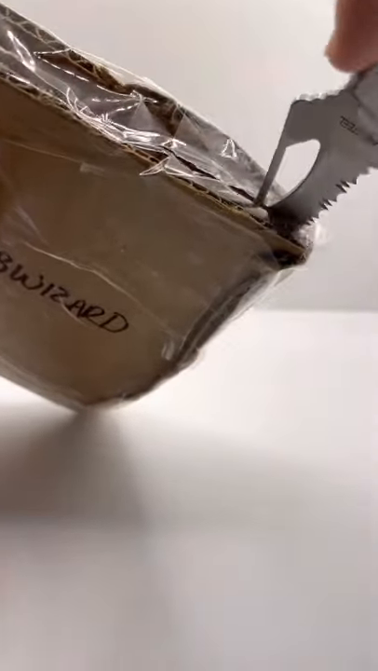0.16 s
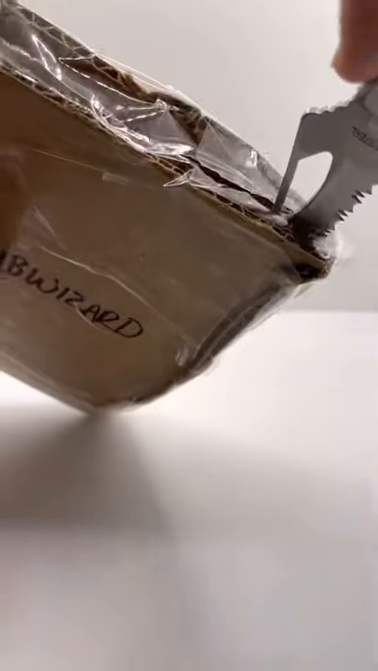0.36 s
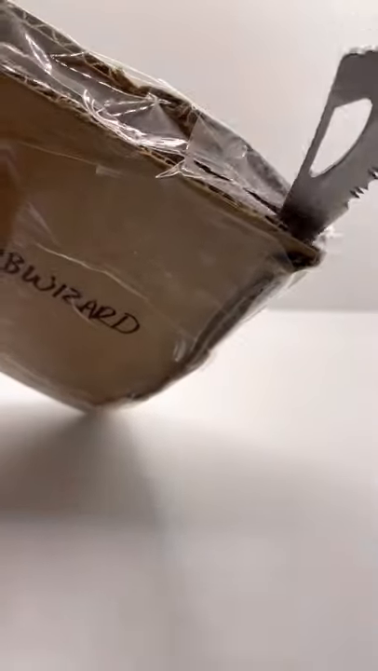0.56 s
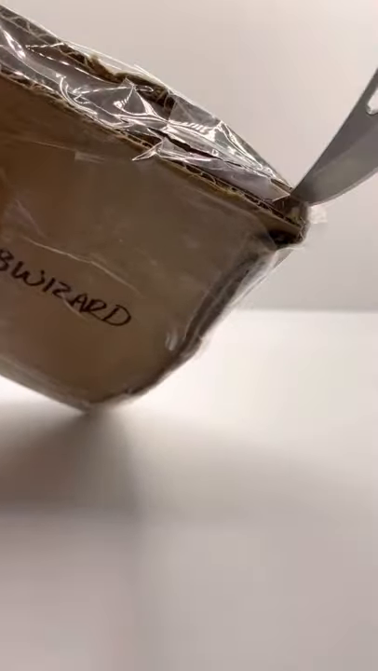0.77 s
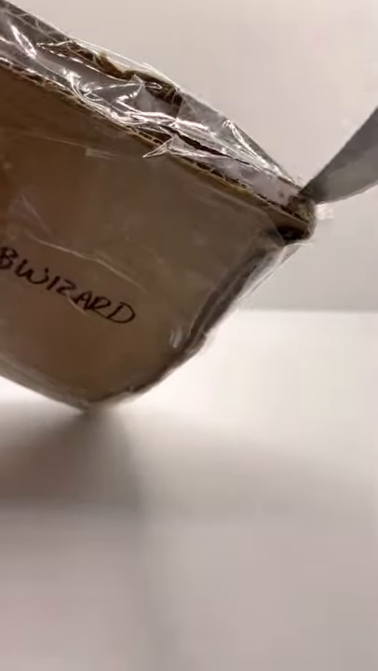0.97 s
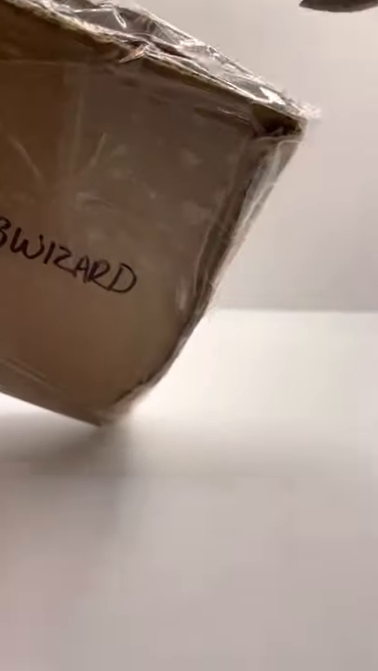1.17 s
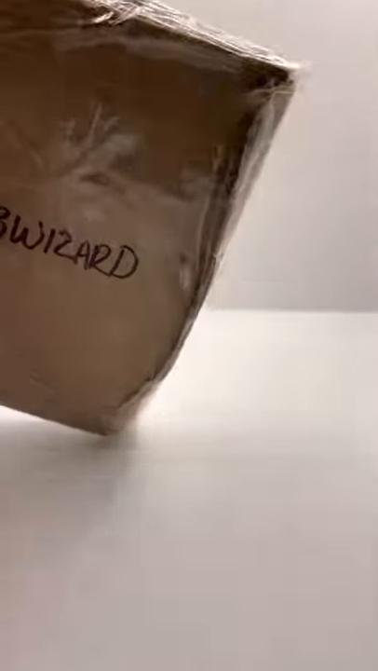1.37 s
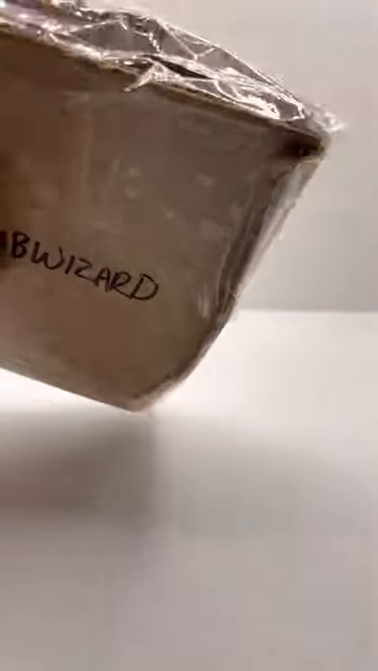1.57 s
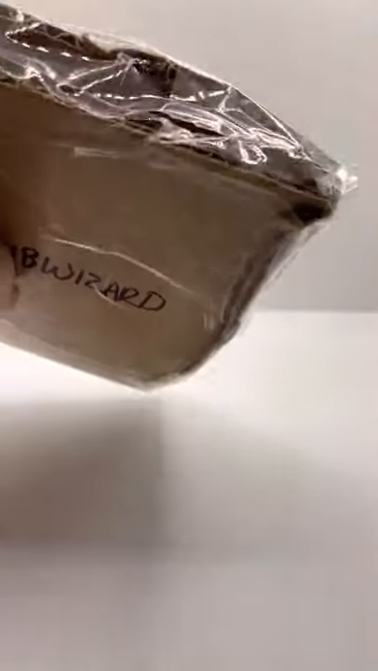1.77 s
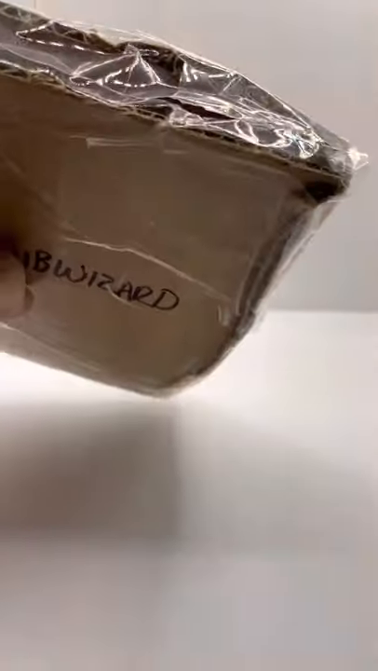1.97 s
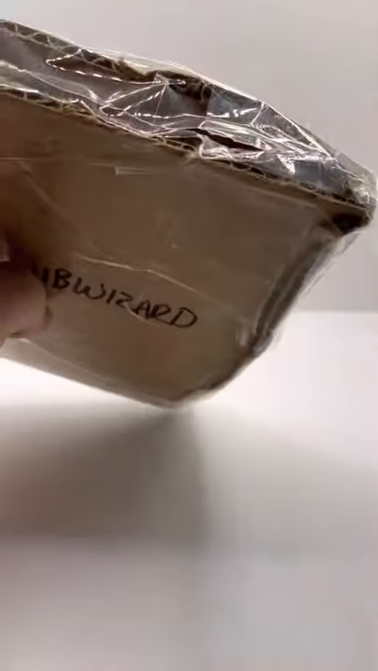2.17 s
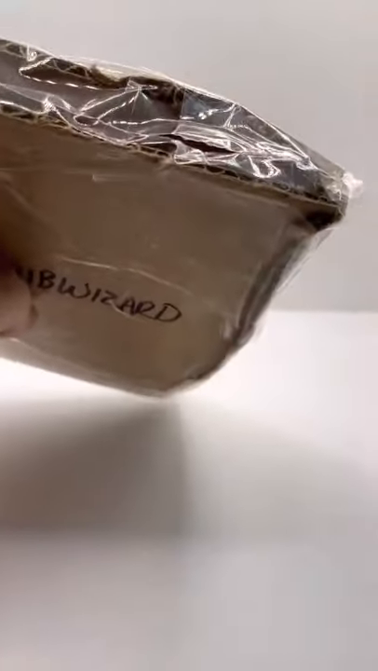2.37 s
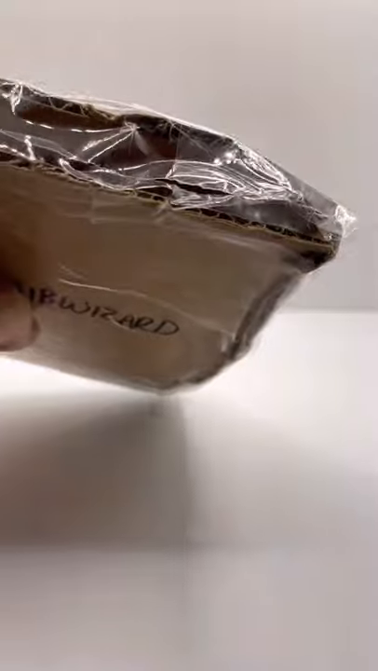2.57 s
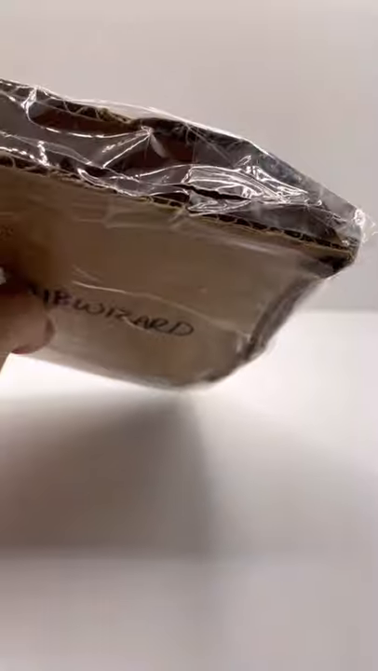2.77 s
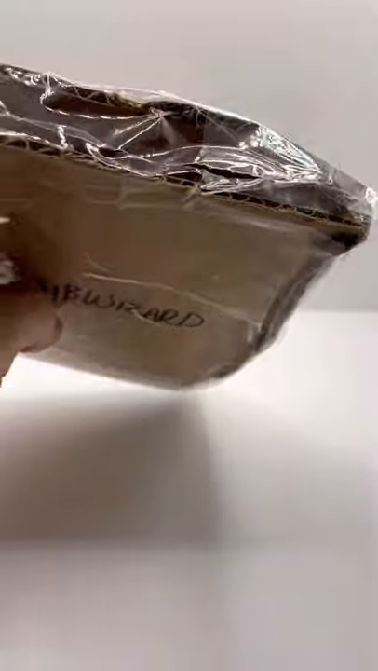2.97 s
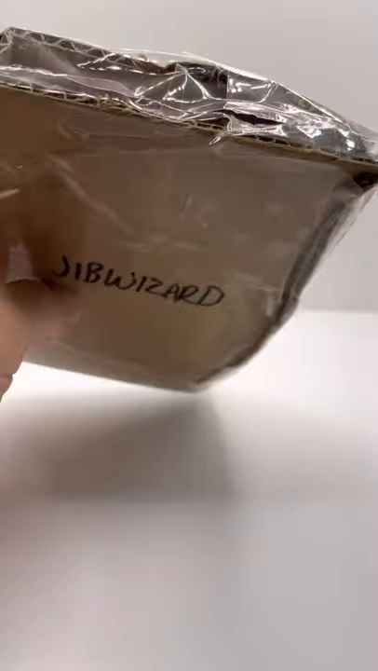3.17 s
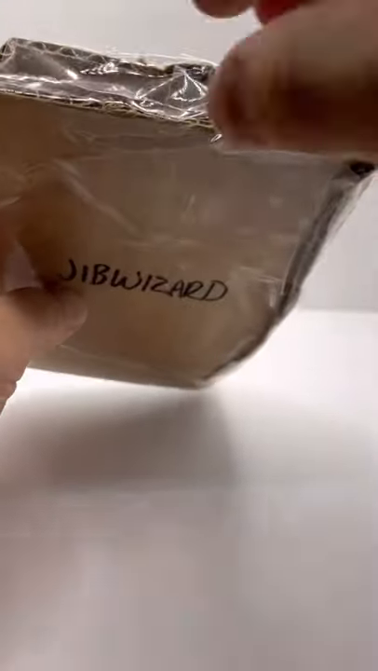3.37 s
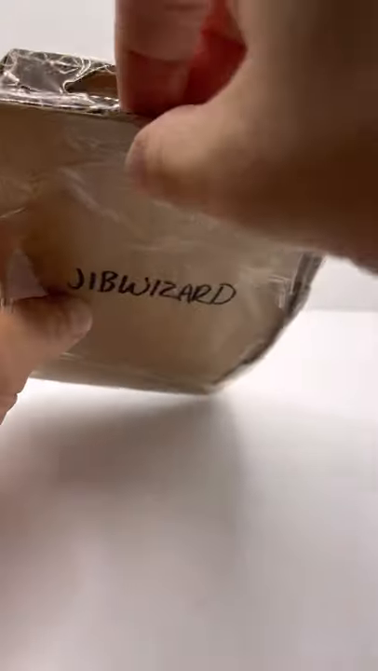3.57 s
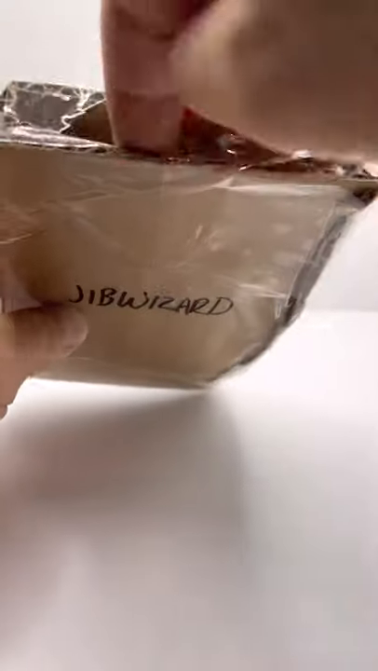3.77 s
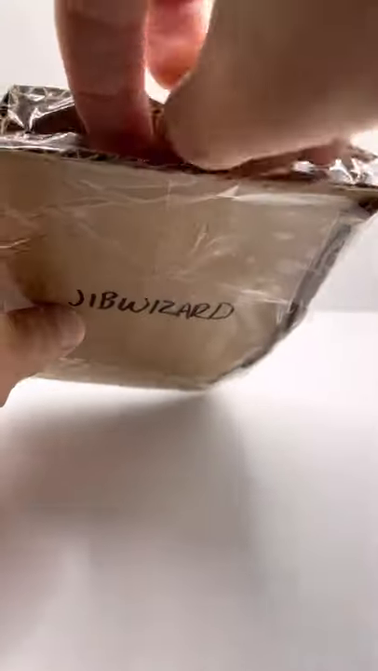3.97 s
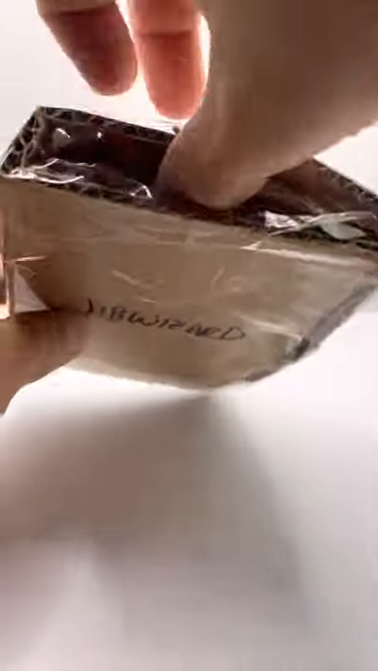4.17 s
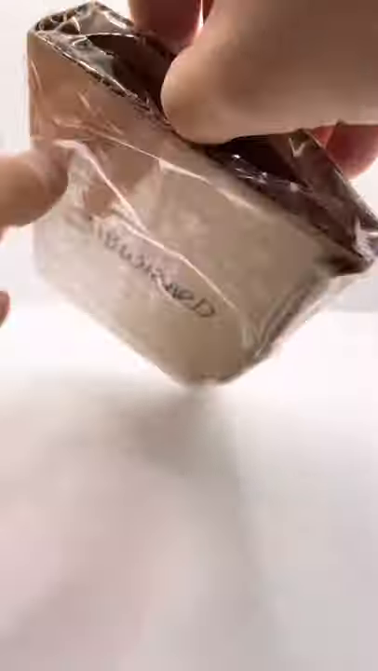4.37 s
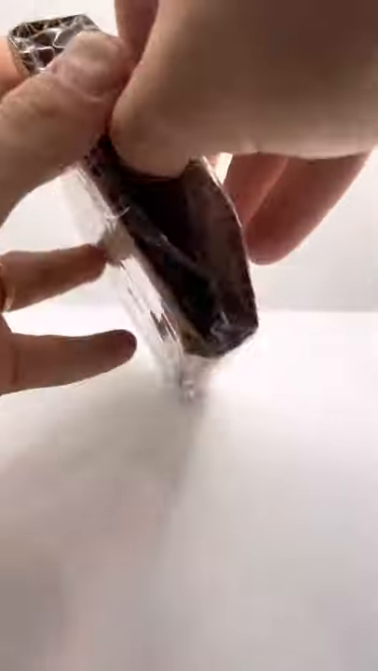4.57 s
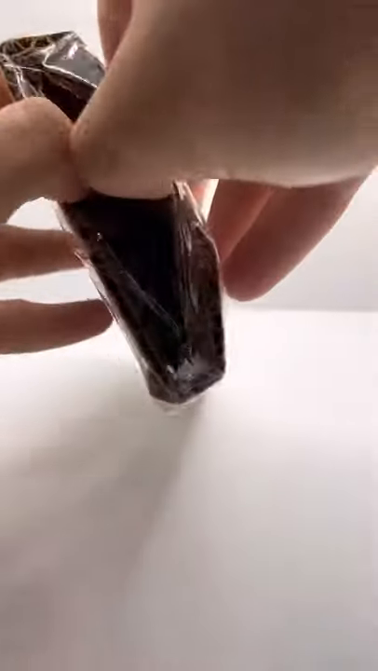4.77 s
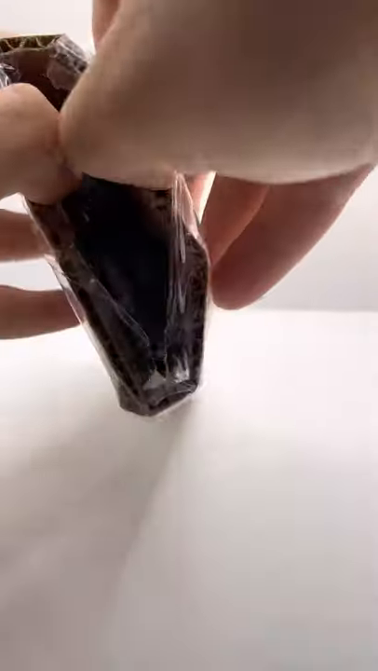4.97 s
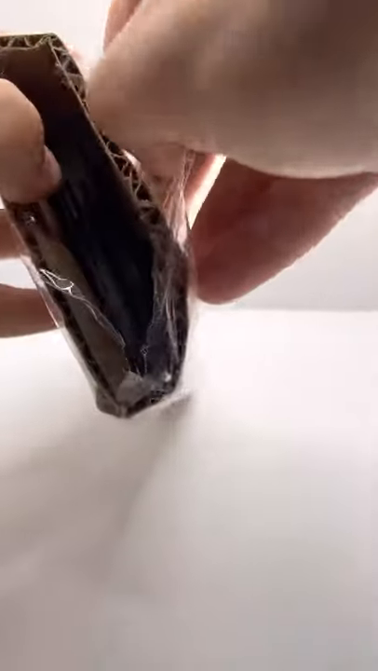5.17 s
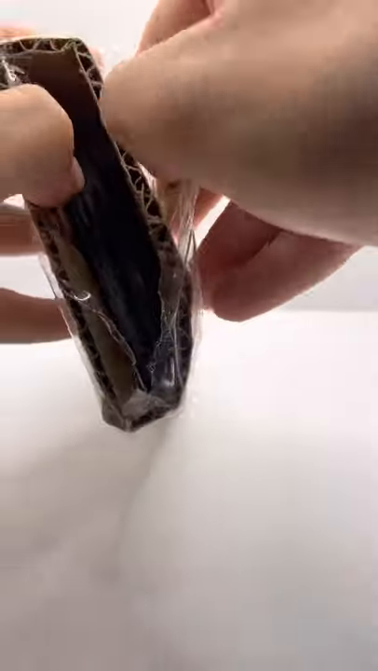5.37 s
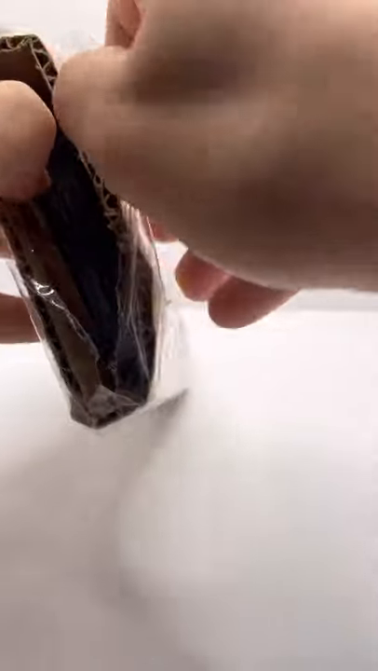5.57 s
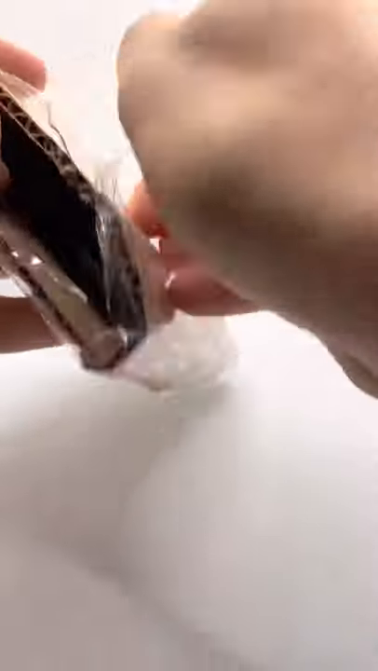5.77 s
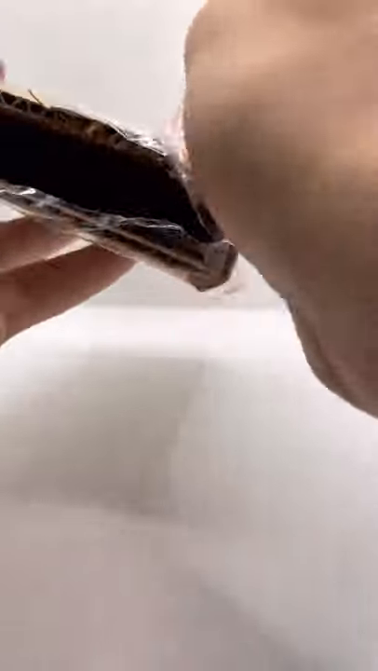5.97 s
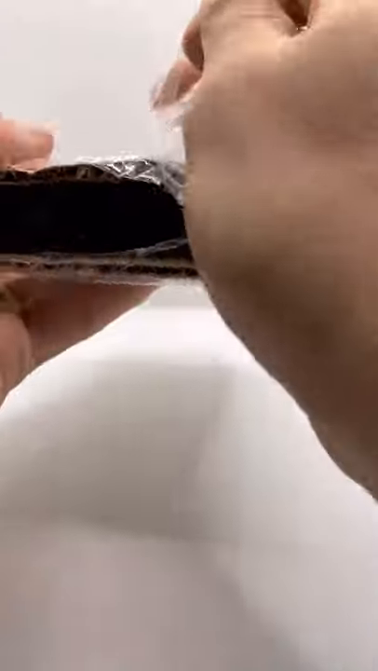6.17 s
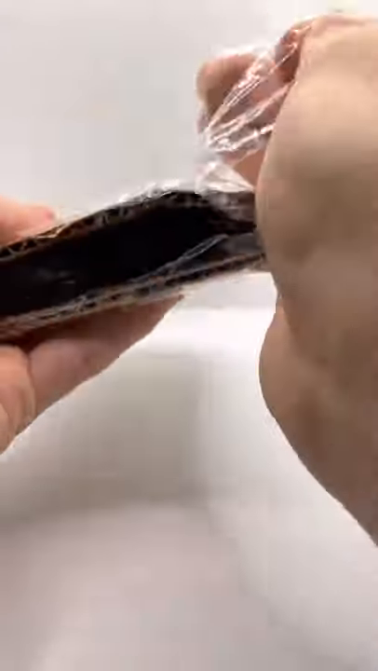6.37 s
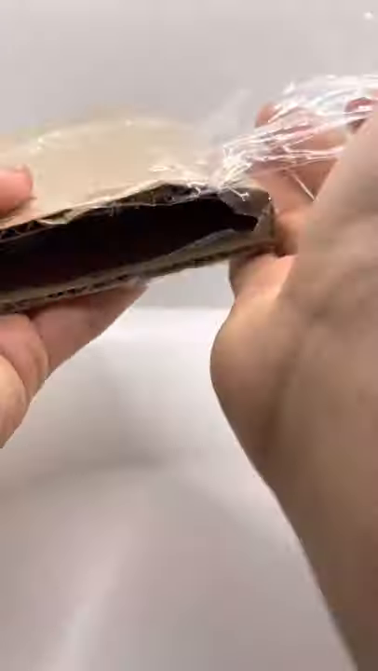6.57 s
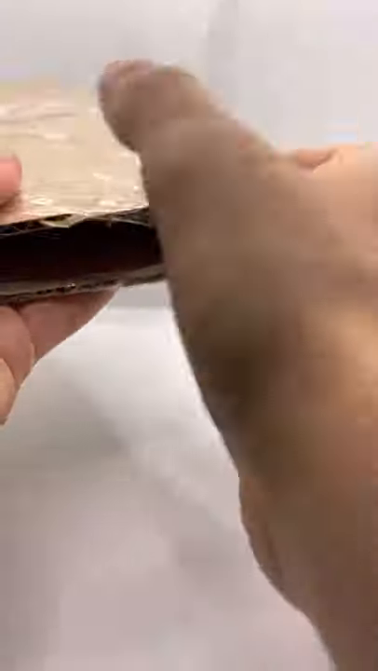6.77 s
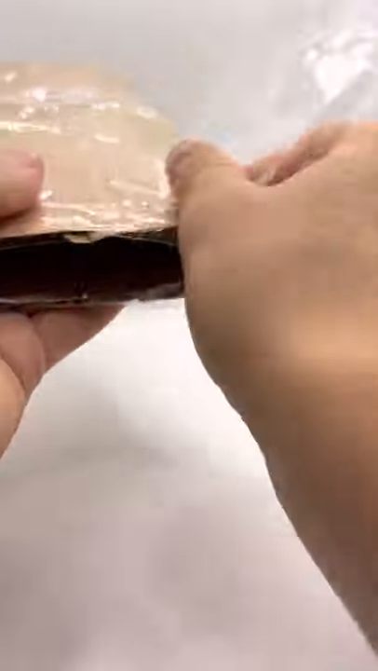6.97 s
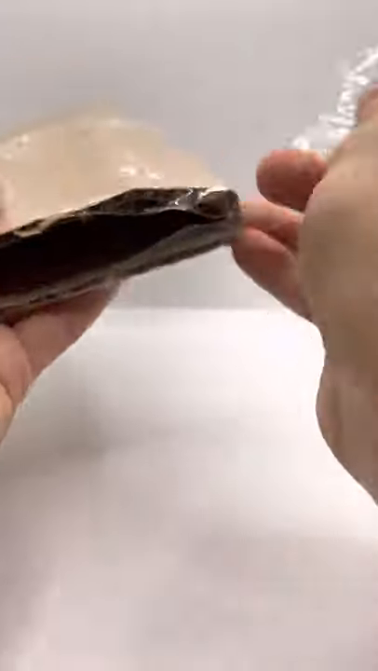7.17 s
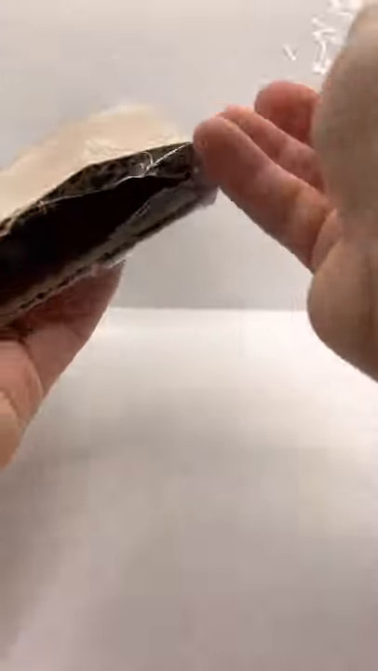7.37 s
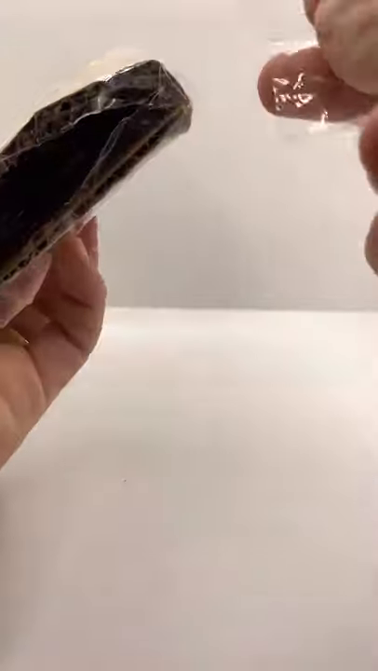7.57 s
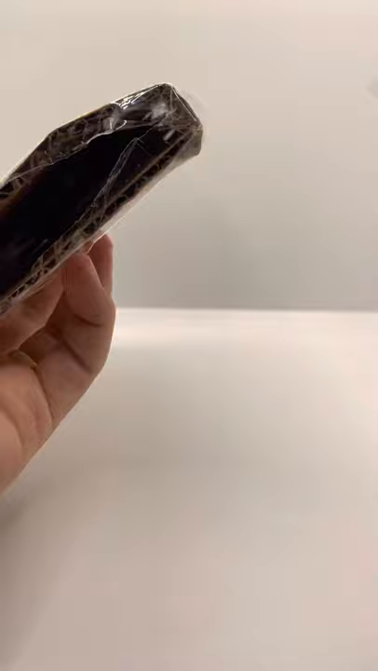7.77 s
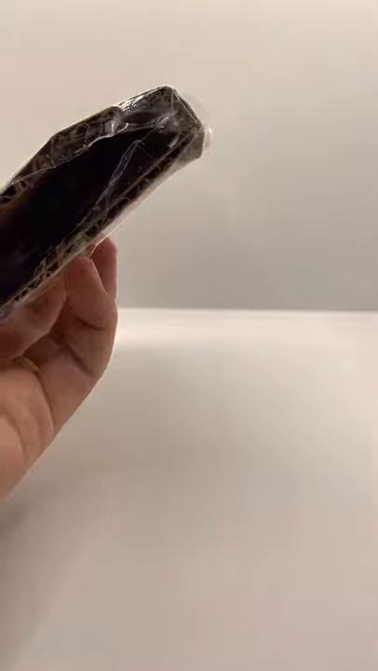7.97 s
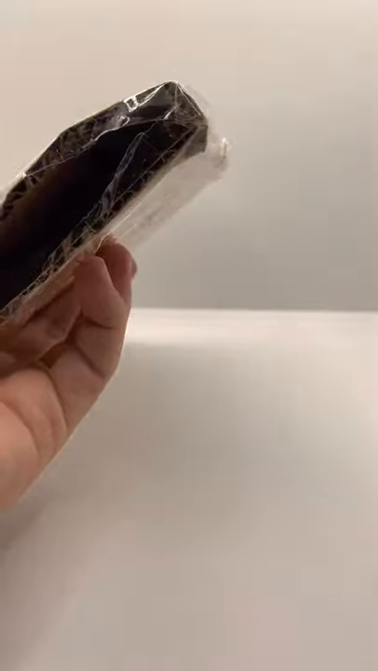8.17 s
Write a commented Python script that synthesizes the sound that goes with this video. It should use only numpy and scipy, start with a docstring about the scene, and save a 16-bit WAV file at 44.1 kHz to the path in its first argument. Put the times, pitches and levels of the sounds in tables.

```python
"""Plastic wrap, stretched by fingers, snaps again and again and rips off in three pulls: runs of tiny
fractures ring the film and thump a cardboard mailer. Before that a knife picks and scrapes at packing
tape (stick-slip grains, tip nicks) and is put down on the table (damped modes). Bumps, dents and
rustling surround it. Close to a two-port microphone, in a small dry room with a low drone."""
import sys
import numpy as np
from scipy import signal
from scipy.fft import rfft, irfft, next_fast_len
from scipy.io import wavfile
from scipy.ndimage import uniform_filter1d

SR = 44100
rng = np.random.default_rng(int(sys.argv[2]) if len(sys.argv) > 2 else 0)


def unload_audio(sound):
    """Save the sound as a 16-bit wav file, at the path given as the first command line argument."""
    columns = np.transpose(np.atleast_2d(sound))
    # keep every value between -1 and 1, then stretch to whole-number steps
    steps = np.round(np.clip(columns, -1, 1) * 32767)
    wavfile.write(sys.argv[1], SR, steps.astype(np.int16))


N = 362061
TIME_S = np.arange(N) / SR

# low room noise: hz, level_db
DRONE_SPECTRUM = [(12, -50), (25, -24), (60, -10), (100, -7), (140, -1), (200, -3), (290, -7), (340, -15),
                  (400, -23), (480, -17), (700, -35), (1000, -38), (1500, -46), (4000, -55), (16000, -61)]
# drone level over time: s, level_db
DRONE_LEVEL = [(0, -43), (2.2, -46), (3.3, -43), (4.84, -45.5), (4.92, -64.5), (5.22, -60), (5.34, -47.5),
               (5.7, -49.5), (5.9, -59), (8.21, -57)]
# hum in the drone: pitch_hz, level_re_drone_db
HUM_TONES = [(137, -6.5), (272.6, -20.5)]
# blade drags along the taped edge: start_s, length_s, level_db, body_re_level_db
BLADE_STROKES = [(0.041, 0.07, -28, -4), (0.173, 0.032, -32, -1.5), (0.307, 0.029, -39, 3.5),
                 (0.395, .078, -31.5, 0), (0.537, .012, -42, 3.5), (0.641, .138, -39, 3.5),
                 (0.854, 0.02, -49, 4), (0.966, 0.096, -40, 2.5)]
# blade slides out of the slit: s, level_db
BLADE_WITHDRAWAL = [(1.085, -73), (1.15, -59.5), (1.24, -53.5), (1.31, -60.5), (1.6, -73.5), (1.7, -85)]
# blade on tape: hz, level_db
BLADE_HISS_SPECTRUM = [(700, -29), (1800, -8.5), (3000, 2), (4600, -2.5), (5600, -2), (8500, 0),
                       (11000, -1), (16000, -5.5)]
# cardboard under the blade: hz, level_db
BLADE_BODY_SPECTRUM = [(100, -21.5), (300, -3), (550, -1), (900, 4), (1200, -7), (1500, -4.5), (2300, -3),
                       (4000, -15.5), (8000, -47)]
# knife tip nicks the tape: start_s, level_db, split_s, bright_db, ring_hz, ring_re_level_db
TAPE_NICKS = [(0.034, -29.5, 0.005, -4, 2500, -11), (0.0524, -24.5, 0.00078, 4, 2560, -16),
              (0.0724, -16.5, 0.0043, -3.5, 1890, -5.5), (0.1416, -37, 0.0065, 17, 1270, -27),
              (0.192, -28, .005, 3, 2580, -19), (0.309, -37, .009, 5, 1080, -2),
              (0.3956, -31.5, 0.0096, -9, 1310, -1), (0.5556, -28, .0006, -8.5, 2930, -12),
              (0.6166, -29, 0.00078, 3, 990, 0), (0.6382, -29, .0007, 6, 1000, -8),
              (0.9666, -39.5, 0.0029, -1, 1007, -2), (0.984, -38.5, 0.0044, -1, 1010, -1),
              (1.0986, -29, 0.0025, 15, 2490, -25), (1.107, -31.5, .0006, 14, 2420, -19.5),
              (1.494, -61, .0014, 5, 2480, -19.5), (1.534, -60.5, 0.0011, 1.5, 2520, -9.5)]
# mailer and knife bump table and hands: start_s, push_db, thud_db, clatter_db, contact_s
TABLE_KNOCKS = [(0.073, -46, -28.5, -37, 0.0059), (2.762, -41, -27, -21, 0.0058),
                (2.78, -33.5, -23, -38.5, 0.0078), (2.815, -33, -41, -38.5, 0.0058),
                (3.032, -61.5, -37, -40, 0.0017), (3.936, -42.5, -46, -65, 0.0065),
                (4.859, -45, -25, -32, 0.001), (6.121, -33, -35.5, -44.5, 0.0032),
                (6.263, -28.5, -37, -48.5, 0.0031), (6.718, -39.5, -41.5, -51, 0.0037),
                (6.747, -45, -65, -69, 0.008), (6.971, -46, -71, -55, 0.0063),
                (7.93, -44.5, -48.5, -58, 0.0067)]
# table resonances: hz, width_hz, level_db
TABLE_RESONANCES = [(212, 15, -10.5), (277, 9.8, 4.5), (593, 100, -26.5)]
# clatter of a bump: hz, level_db
CLATTER_SPECTRUM = [(250, -31.5), (550, -3.5), (900, -2), (1200, -2), (1700, -6.5), (2150, -4.5),
                    (3400, -10.5), (5200, -15.5), (9000, -27)]
# knife grazes the table as it is laid down: start_s, level_db, rise_s, decay_s
KNIFE_GRAZES = [(1.909, -48.5, 0.0033, 0.034), (2.561, -46.5, 0.0081, 0.028), (2.703, -40.5, 0.015, 0.063)]
# knife resonances: hz, width_hz, level_db
KNIFE_RESONANCES = [(940, 46, 2.5), (1900, 590, -13.5), (2940, 280, -9.5), (4220, 520, -21.5),
                    (6300, 4500, -22.5), (10000, 980, -24.5)]
# cardboard dents under the fingers with a dull crunch: start_s, level_db, ring_hz
CARDBOARD_DENTS = [(2.157, -63, 1273), (3.4816, -34.5, 1360), (3.5177, -31, 1720), (3.5457, -32.5, 1120),
                   (3.688, -39.5, 1250), (3.8749, -35.5, 1380), (3.9792, -37, 1260), (4.0756, -35.5, 1920),
                   (4.367, -44.5, 1420), (4.5818, -44, 1920), (5.406, -38.5, 2680), (5.6494, -28.5, 1420),
                   (5.93, -57, 1870), (6.8228, -59, 1720), (7.2959, -49.5, 1060)]
# fingers slide over the wrap or pull it taut: start_s, length_s, level_db, body_re_level_db
FINGER_RUBS = [(3.492, 0.071, -43, 6), (3.858, .13, -41.5, -8.5), (4.256, .11, -37, -7),
               (4.743, 0.013, -38.5, -6), (4.844, 0.0098, -42.5, -4), (5.406, .025, -42, 5.5),
               (5.613, 0.16, -33, -8), (6.355, 0.025, -26.5, -14), (6.61, 0.017, -38, -7),
               (6.987, 0.07, -36, -9), (7.849, .075, -41, -8)]
# wrap rustles while held: s, level_db
WRAP_HANDLING = [(3.39, -77), (3.435, -55), (3.8, -57), (4.08, -47.5), (4.19, -59), (4.35, -57),
                 (4.52, -50), (4.82, -52), (4.95, -56.5), (5.33, -61), (5.52, -52.5), (6.031, -68.5),
                 (6.449, -49), (6.82, -76), (7.17, -47.5), (7.28, -71), (7.699, -62), (8.2, -85.5)]
# stretched wrap snaps: start_s, level_db, split_s, bright_db, ring_hz, ring_re_level_db
WRAP_SNAPS = [(3.553, -10.5, .006, 11, 1230, -21), (3.6545, -27, 0.00067, -3.5, 2150, -6),
              (3.7431, -34.5, 0.0037, -2.5, 1130, -5), (4.0257, -22.5, 0.0027, 0.5, 1440, -17),
              (4.04, -17, .004, 0, 990, -11.5), (4.0656, -20.5, .0006, 2, 1830, -21),
              (4.0907, -17.5, 0.00059, 7, 1270, -10.5), (4.2273, -22, .0025, 20.5, 1010, -27.5),
              (4.2633, -18, 0.0099, -0.5, 1940, -4), (4.293, -23, .0006, -3, 1920, -10.5),
              (4.4129, -23, 0.00054, 3, 2390, -17), (4.61, -33.5, 0.0039, 14, 1450, -14),
              (4.651, -17.5, 0.0026, 5, 2300, -11.5), (4.7584, -16.5, 0.0037, 3, 2380, -8.5),
              (4.8596, -21.5, 0.007, -1.5, 1970, -5.5), (4.937, -40.5, 0.0017, 13.5, 1440, -16),
              (4.9993, -17.5, 0.0046, -0.5, 1380, -10), (5.094, -20.5, .0025, 2.5, 2350, -6.5),
              (5.1233, -27.5, .0007, 5.5, 1490, -26), (5.1559, -19.5, 0.0017, -6.5, 1410, -14.5),
              (5.2058, -30, 0.0012, .5, 2420, -15.5), (5.267, -24, 0.0049, 1, 2430, -15.5),
              (5.5392, -28.5, 0.0086, 6.5, 3030, -17), (5.5966, -20, 0.0044, -4.5, 1100, -15.5),
              (5.6228, -16, .005, -1.5, 2730, -12.5), (5.656, -17, 0.0026, -2, 1850, -21),
              (5.6709, -13.5, .0067, 1, 1780, -9), (5.7099, -17, .0036, 4, 3100, -23),
              (5.7384, -17, .0038, -0.5, 1400, -20), (5.7552, -12.5, 0.008, 4.5, 1830, -11),
              (6.12, -11.5, 0.0089, -1, 1580, -4.5), (6.2351, -24, .0017, 3, 1410, -12),
              (6.2635, -11.5, .0073, -1.5, 1820, -10.5), (6.298, -17, 0.0084, 0.5, 2500, -9),
              (6.3306, -17, .006, -0.5, 2080, -8.5), (6.3399, -18, .006, -2, 2170, -6.5),
              (6.3943, -28, 0.0028, 2.5, 2730, -3), (6.4126, -24.5, .005, 4, 2300, -13.5),
              (6.4327, -29, .005, 6.5, 1400, -21), (6.4586, -24.5, 0.0036, .5, 1420, -21),
              (6.5017, -25, 0.0065, 2.5, 2650, -10.5), (6.522, -24.5, 0.0049, 6, 2050, -12.5),
              (6.5746, -32, 0.0069, -2.5, 2560, -11), (6.605, -26.5, 0.0016, 3, 2760, -14.5),
              (6.6373, -33, .0016, 11, 2970, -24), (6.971, -28.5, 0.0082, -2.5, 3000, -11),
              (7.0389, -28.5, .0013, 2.5, 2840, -23), (7.0649, -13, .012, 3, 2350, -10.5),
              (7.1143, -11.5, .01, 0.5, 1430, -15.5), (7.208, -46.5, .002, 2, 2400, -16),
              (7.2537, -31.5, 0.0055, -0.5, 1360, -18), (7.3538, -52.5, .0006, -10.5, 2910, -2.5),
              (7.408, -41.5, 0.0025, 3, 2610, -21.5), (7.472, -47, 0.0029, -10, 2460, -5),
              (7.636, -54.5, .001, -17, 2600, -3), (7.6562, -50, 0.0017, -15, 3080, -6),
              (7.6707, -44.5, .0011, -8, 2900, -12.5), (7.707, -52, 0.0032, -4, 2700, -2),
              (7.801, -49, 0.0005, -11, 3080, -12.5), (7.8208, -39, .0006, -2.5, 3080, -25),
              (7.87, -29, .0006, 3, 2710, -23), (7.9028, -35, .0006, -6, 2730, -9),
              (7.9283, -32, .0006, 4, 1007, -13)]
# running rips: start_s, length_s, level_db, body_re_level_db
WRAP_RIPS = [(5.763, 0.072, -16.5, -11.5), (6.273, .078, -18, -7.5), (7.069, 0.082, -20, -13.5)]
# fractures and wrap hiss: hz, level_db
CRACK_SPECTRUM = [(600, -44.5), (1800, -15.5), (3200, -7), (4800, -1), (6300, 0), (9000, 2.5), (11000, 2),
                  (16000, -1.5)]
# ring of the film: hz, level_db
FILM_SPECTRUM = [(450, -26.5), (950, -5), (1500, -1), (2800, -1), (3600, -4), (6000, -38.5)]
# thump of box or table: hz, level_db
THUMP_SPECTRUM = [(60, -27.5), (170, -1), (300, -4.5), (600, 5), (850, -0.5), (1200, -10.5), (2500, -46)]
# body under the wrap, also the rub of a graze: hz, level_db
WRAP_BODY_SPECTRUM = [(80, -17.5), (280, -5), (600, 5), (850, 0), (1100, 2.5), (1450, 1.5), (2100, 2),
                      (3000, -4), (6000, -52)]
# hollow mailer resonances: hz, width_hz, level_db
BOX_RESONANCES = [(300, 30, -6), (845, 50, -4), (1500, 50, -8), (602, 28, -9.5)]
# room decay: hz, t60_s
ROOM_DECAY = [(200, 0.3), (1000, 0.22), (4000, 0.23), (12000, 0.16)]
# microphone response: hz, level_db
MIC_RESPONSE = [(20, -2), (11600, 0.5), (12400, -8), (13200, -12), (14000, -27.5), (15700, -24)]
# phase between the ports: hz, left_lead_rad
PORT_LEAD = [(20, 0), (860, 0), (1120, -1.2), (1380, 0), (2800, .7), (4050, .7), (4600, 2), (5100, 4.2),
             (5600, 6.1), (6300, 6.45), (8000, 8.8), (8700, 9.35), (9400, 9.5), (12000, 12.5),
             (13600, 12.7), (14700, 15.6)]
# likeness of the ports: hz, correlation_0_to_1
PORT_CORRELATION = [(20, .998), (250, .996), (750, .93), (1120, .55), (1500, .97), (2000, .95), (2800, .55),
                    (3800, .8), (4700, .75), (6000, .97), (7200, .9), (9000, .997), (10500, .94),
                    (13000, .97)]

DENT_SPLIT_S, DENT_BRIGHT_DB, DENT_RING_RE_LEVEL_DB = 0.006, -2.5, 1
PUSH_HZ, PUSH_CONTACT_S, PUSH_LAW = 130, 0.0037, 0.99  # longer contact, lower push
DECAY_PER_CONTACT, SCUFF_RE_CLATTER_DB = 3.77, -11.5
CEILING, EDGE_HZ = 0.85, 15900


def amp(db):
    """Decibels to amplitude."""
    return 10 ** (np.asarray(db) / 20)


def read(points, hz):
    """A table read on a log-frequency axis."""
    table_hz, value = np.transpose(points)
    return np.interp(np.log(hz + 1), np.log(table_hz + 1), value)


def evened(x):
    """Scales to RMS 1."""
    return x / np.sqrt(np.mean(x ** 2) + 1e-20)


def as_click(x):
    """Scales a short sound to the energy of 10 ms at full level per channel."""
    return x / np.sqrt(np.sum(x ** 2) / len(x) / (SR / 100) + 1e-20)


def add(mix, start_s, sound):
    """Mixes a sound in at its start time, cut at the end of the mix."""
    part = mix[:, max(round(start_s * SR), 0):][:, :sound.shape[1]]
    part += sound[:, :part.shape[1]]


def convolve(x, response):
    """Filters each channel, length unchanged."""
    return signal.fftconvolve(x, np.atleast_2d(response), axes=1)[:, :x.shape[1]]


def colour(points, size=4096):
    """Causal minimum-phase impulse response of a spectrum, by folding its cepstrum."""
    level_db = read(points, np.fft.rfftfreq(size, 1 / SR))
    cepstrum = irfft(np.log(amp(level_db)))
    cepstrum[1:size // 2] *= 2
    cepstrum[size // 2 + 1:] = 0
    return irfft(np.exp(rfft(cepstrum)))[:size // 2]


def resonate(x, hz, width_hz):
    """One resonance of peak gain 1."""
    return signal.lfilter(*signal.iirpeak(hz, hz / width_hz, SR), x)


def drone(waver_hz=5):
    """Low room noise with a hum whose pitch wavers at random."""
    air = evened(convolve(rng.standard_normal((2, N)), colour(DRONE_SPECTRUM)))
    for hz, db in HUM_TONES:
        drift = evened(uniform_filter1d(rng.standard_normal(N), size=3000))
        phase = 2 * np.pi * np.cumsum(hz + waver_hz * drift) / SR
        air = air + amp(db) * np.sqrt(2) * np.sin(phase)
    return air * amp(np.interp(TIME_S, *np.transpose(DRONE_LEVEL)))


def stroke(start_s, length_s, db, body_db, attack_s, sag_db_per_s, release_s, depth_db=30):
    """One movement bites, eases off and lets go: rows of s, level_db, body_re_level_db."""
    end_s = start_s + length_s
    eased_db = db - sag_db_per_s * length_s
    return [(start_s - attack_s, db - depth_db, body_db), (start_s, db, body_db),
            (end_s, eased_db, body_db), (end_s + release_s, eased_db - depth_db, body_db)]


def friction(curve, hiss, body, slips_per_s, spread_db, slip_s, smooth, hiss_trim_db, body_trim_db):
    """Dense stick-slip grains of uneven size hiss in the film and sound the cardboard under it."""
    s, level_db, body_db = np.transpose(curve)
    t = np.arange(s[0], s[-1], 1 / SR)
    sizes = amp(spread_db * np.minimum(rng.exponential(1, len(t)), 4))
    slips = sizes * (rng.random(len(t)) < slips_per_s / SR)
    power = signal.lfilter([1], [1, -np.exp(-2 / (slip_s * SR))], slips ** 2)
    # smooth: steady power under the grains
    envelope = np.sqrt(power / (power.mean() + 1e-12) + smooth)
    grains = rng.standard_normal((2, len(t))) * envelope
    drive = amp(np.interp(t, s, level_db)) * signal.windows.tukey(len(t), 0.01)
    top = amp(hiss_trim_db) * evened(convolve(grains, colour(hiss)))
    low = amp(np.interp(t, s, body_db) + body_trim_db) * evened(convolve(grains, colour(body)))
    out = np.zeros((2, N))
    add(out, s[0], drive * (top + low))
    return out


def snap(split_s, bright_db, ring_hz, ring_db, crack_trim_db, thump_re_ring_db,
         rise_s=0.0001, fall_s=0.0016, sag=0.3, flutter_db=-18, flutter_s=0.009, spiky_db=4.5,
         ring_width_hz=230, broad_db=-8, facet_width_hz=300, facet_db=5):
    """A quick run of tiny fractures rings the film and thumps the box."""
    t = np.arange(SR // 12) / SR
    fall = np.exp(-np.maximum(t - split_s, 0) / fall_s - sag * np.minimum(t / split_s, 1))
    splitting = np.minimum(t / rise_s, 1) * fall
    fractures = amp(spiky_db * evened(uniform_filter1d(rng.standard_normal(len(t)), size=14)))
    flutter = amp(flutter_db) * np.exp(-t / flutter_s)
    burst = rng.standard_normal((2, len(t))) * (splitting * fractures + flutter)
    # small creased facets ping at a different pitch every time
    facets = sum(resonate(burst, hz, facet_width_hz) for hz in rng.uniform(3800, 12000, size=3))
    # thinner, tighter film snaps brighter
    tilt = colour([(7000, 0), (10500, bright_db)], size=256)
    pinging = convolve(burst + amp(facet_db) * facets, tilt)
    crack = amp(crack_trim_db) * as_click(convolve(pinging, colour(CRACK_SPECTRUM)))
    film = resonate(burst, ring_hz, ring_width_hz) + amp(broad_db) * burst
    ringing = as_click(convolve(film, colour(FILM_SPECTRUM)))
    thump = amp(thump_re_ring_db) * as_click(convolve(burst, colour(THUMP_SPECTRUM)))
    return crack + amp(ring_db) * (ringing + thump)


def catches(move, per_s, above_db, spread_db, split_s, ring_db, low_hz, high_hz):
    """Small pops at random moments, of twelve random pitches, louder while the hand works harder."""
    out = np.zeros((2, N))
    s, level_db = np.transpose(move)[:2]
    span_s = s[-1] - s[0]
    pops = [snap(split_s, 0, hz, ring_db, crack_trim_db=-1.5, thump_re_ring_db=-7)
            for hz in rng.uniform(low_hz, high_hz, size=12)]
    for when, which, strength in rng.random((int(per_s * span_s), 3)):
        at_s = s[0] + when * span_s
        db = np.interp(at_s, s, level_db) + above_db - spread_db * np.log(1 - strength)
        add(out, at_s, amp(db) * pops[int(which * len(pops))])
    return out


def blade(withdrawal_body_db=-6):
    """The knife edge grates through tape in short strokes, catching on its fibres, then slides out."""
    cuts = [stroke(*row, attack_s=0.02, sag_db_per_s=59, release_s=0.055) for row in BLADE_STROKES]
    leaving = [(s, db, withdrawal_body_db) for s, db in BLADE_WITHDRAWAL]
    grating = sum(friction(move, BLADE_HISS_SPECTRUM, BLADE_BODY_SPECTRUM, slips_per_s=1900,
                           spread_db=3.5, slip_s=0.0006, smooth=0.45,
                           hiss_trim_db=-0.9, body_trim_db=-4)
                  for move in cuts + [leaving])
    whole_cut = sorted(sum(cuts, []))
    return grating + catches(whole_cut, per_s=60, above_db=-7, spread_db=2, split_s=0.0015,
                             ring_db=0, low_hz=811, high_hz=3230)


def nicks():
    """The knife tip splits the tape and presses on the box, which thumps."""
    out = np.zeros((2, N))
    for start_s, db, *shape in TAPE_NICKS:
        add(out, start_s, amp(db) * snap(*shape, crack_trim_db=2.5, thump_re_ring_db=-3))
    return out


def contact(sound, rise_s, decay_s):
    """Shapes a vibration by a contact that builds up and dies away, at full level on its crest."""
    t = np.arange(sound.shape[1]) / SR
    pressure = np.minimum(t / rise_s, 1) * np.exp(-np.maximum(t - rise_s, 0) / decay_s)
    return evened(sound * pressure) * np.sqrt(np.mean(pressure ** 2))


def knocks():
    """Blunt contacts: a low push, the table's modes, a clatter and a scuff."""
    out = np.zeros((2, N))
    for start_s, push_db, thud_db, clatter_db, contact_s in TABLE_KNOCKS:
        force = rng.standard_normal((2, SR // 3))
        push_hz = PUSH_HZ * (PUSH_CONTACT_S / contact_s) ** PUSH_LAW
        width_hz = 0.41 * push_hz
        push = resonate(resonate(force[:1], push_hz, width_hz), push_hz, width_hz)
        table = sum(amp(db) * resonate(force[:1], hz, width) for hz, width, db in TABLE_RESONANCES)
        parts = [(push_db, push),
                 (thud_db, convolve(table, colour(THUMP_SPECTRUM))),
                 (clatter_db, convolve(force, colour(CLATTER_SPECTRUM))),
                 (clatter_db + SCUFF_RE_CLATTER_DB, convolve(force, colour(BLADE_HISS_SPECTRUM)))]
        decay_s = DECAY_PER_CONTACT * contact_s
        add(out, start_s, sum(amp(db) * contact(part, contact_s, decay_s) for db, part in parts))
    return out


def grazes(rub_db=-14):
    """Sliding on the table hisses and sets the knife's damped modes ringing."""
    out = np.zeros((2, N))
    for start_s, db, rise_s, decay_s in KNIFE_GRAZES:
        force = rng.standard_normal((2, SR // 4))
        ringing = sum(amp(mode_db) * resonate(force, hz, width_hz)
                      for hz, width_hz, mode_db in KNIFE_RESONANCES)
        rub = amp(rub_db) * convolve(force, colour(WRAP_BODY_SPECTRUM))
        add(out, start_s, amp(db) * contact(ringing + rub, rise_s, decay_s))
    return out


def dents():
    """Cardboard gives under the fingers: a dull crunch that thumps the box."""
    out = np.zeros((2, N))
    for start_s, db, ring_hz in CARDBOARD_DENTS:
        crunch = snap(DENT_SPLIT_S, DENT_BRIGHT_DB, ring_hz, DENT_RING_RE_LEVEL_DB,
                      crack_trim_db=-1, thump_re_ring_db=-2)
        add(out, start_s, amp(db) * crunch)
    return out


def rustle(held_body_db=-6):
    """Loose wrap creases in sparse small ticks as the fingers hold it and slide."""
    moves = [stroke(*row, attack_s=0.035, sag_db_per_s=23.5, release_s=0.049) for row in FINGER_RUBS]
    moves.append([(s, db, held_body_db) for s, db in WRAP_HANDLING])
    return sum(friction(move, CRACK_SPECTRUM, WRAP_BODY_SPECTRUM, slips_per_s=420, spread_db=5,
                        slip_s=0.0028, smooth=0.27, hiss_trim_db=2, body_trim_db=-1.5)
               for move in moves)


def creases():
    """Creases pop in the wrap while it is held."""
    return catches(WRAP_HANDLING, per_s=11, above_db=-1, spread_db=2.5, split_s=0.0014,
                   ring_db=0, low_hz=900, high_hz=3000)


def snaps():
    """Stretched wrap fractures and rings; lifted off, it hardly thumps the box."""
    out = np.zeros((2, N))
    for start_s, db, *shape in WRAP_SNAPS:
        add(out, start_s, amp(db) * snap(*shape, crack_trim_db=1, thump_re_ring_db=-9.5))
    return out


def rips():
    """The stretched wrap gives way in a fast run of fractures."""
    pulls = [stroke(*row, attack_s=0.014, sag_db_per_s=37, release_s=0.024) for row in WRAP_RIPS]
    return sum(friction(pull, CRACK_SPECTRUM, WRAP_BODY_SPECTRUM, slips_per_s=2000, spread_db=0.5,
                        slip_s=0.0013, smooth=0.15, hiss_trim_db=-1, body_trim_db=-2)
               for pull in pulls)


def mailer(x):
    """The hollow box rings along with whatever rubs or cracks on it."""
    return x + sum(amp(db) * resonate(x, hz, width_hz) for hz, width_hz, db in BOX_RESONANCES)


def room(x, near_db=-9, near_t60_s=0.053, far_db=-23):
    """Quick reflections from table, hands and wall, then a faint room tail."""
    t = np.arange(SR // 2) / SR
    sparse = rng.random(len(t)) < 2500 / SR
    taps = rng.standard_normal((2, len(t))) * sparse * (t > 0.002)
    near = taps * amp(-60 * t / near_t60_s)
    noise = rng.standard_normal((2, len(t))) * (t > 0.012)
    hz, at_s, bands = signal.stft(noise, SR, nperseg=256)
    decay = amp(-60 * at_s / read(ROOM_DECAY, hz)[:, None])
    far = signal.istft(bands * decay, SR, nperseg=256)[1][:, :len(t)]
    near_part = amp(near_db) * near / np.linalg.norm(near[0])
    far_part = amp(far_db) * far / np.linalg.norm(far[0])
    return convolve(x, near_part + far_part)


def scene():
    """Box-borne sounds, table contacts, their room, and the drone."""
    on_box = blade() + nicks() + dents() + rustle() + creases() + snaps() + rips()
    package = mailer(on_box) + knocks() + grazes()
    return package + room(package) + drone()


def record(dry):
    """Two nearly alike ports, shifted in phase; peaks are rounded off and the top falls steeply."""
    size = next_fast_len(N + 4096)
    hz = np.fft.rfftfreq(size, 1 / SR)
    left, other = rfft(dry, size)
    same = np.clip(read(PORT_CORRELATION, hz), 0, 1)
    right = same * left + np.sqrt(1 - same ** 2) * other
    right = right * np.exp(-1j * read(PORT_LEAD, hz))
    pair = irfft(np.array([left, right]) * amp(read(MIC_RESPONSE, hz)), size)[:, :N]
    rounded = CEILING * np.tanh(pair / CEILING)
    lowpass = signal.firwin(511, EDGE_HZ, window=("kaiser", 9), fs=SR)
    return signal.oaconvolve(rounded, lowpass[None], "same", axes=1)


dry = scene()
out = record(dry)
unload_audio(out)
```